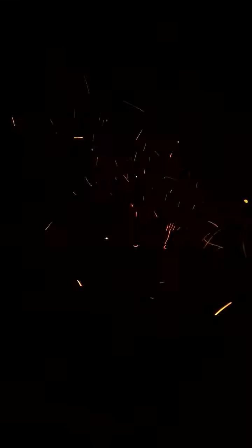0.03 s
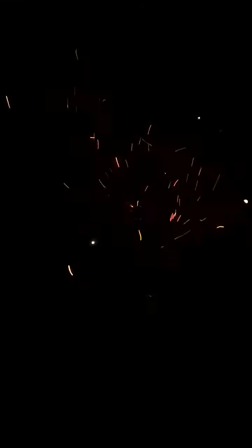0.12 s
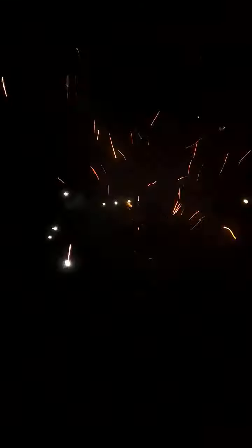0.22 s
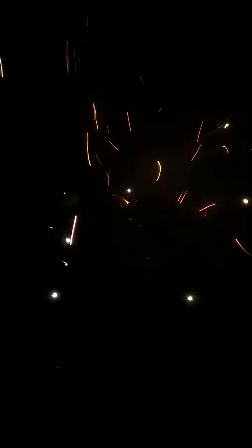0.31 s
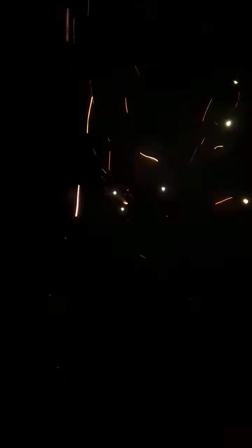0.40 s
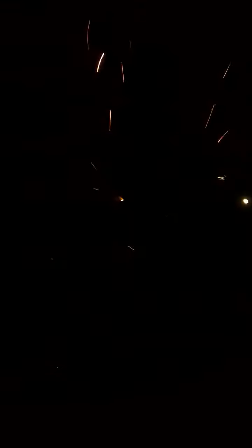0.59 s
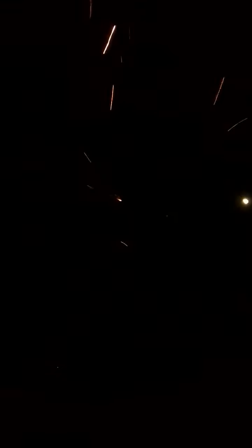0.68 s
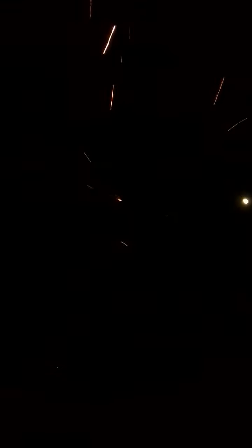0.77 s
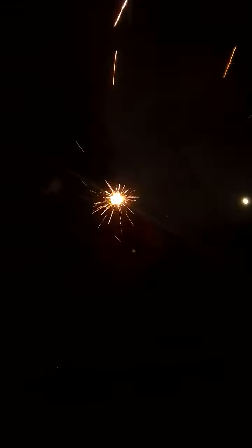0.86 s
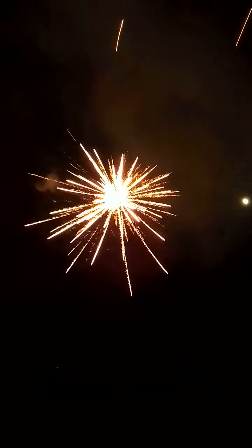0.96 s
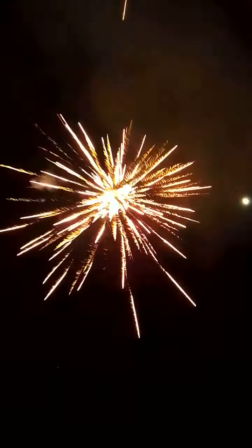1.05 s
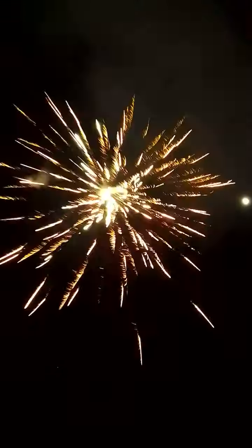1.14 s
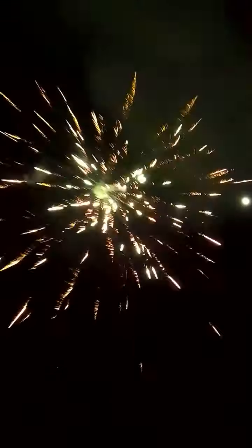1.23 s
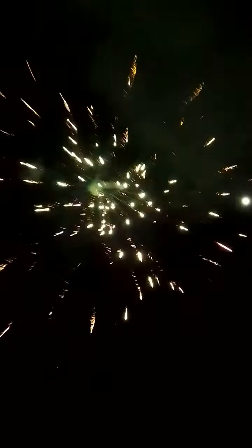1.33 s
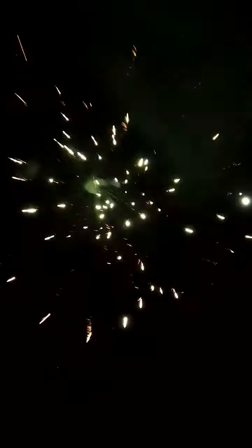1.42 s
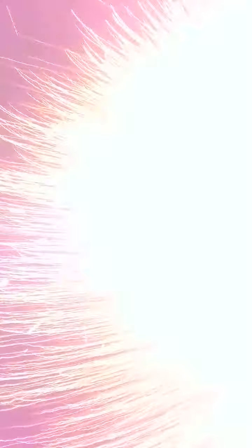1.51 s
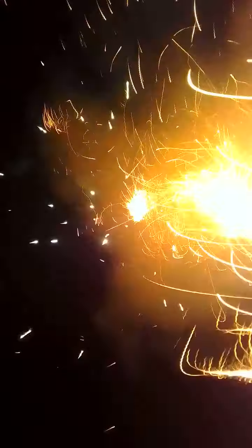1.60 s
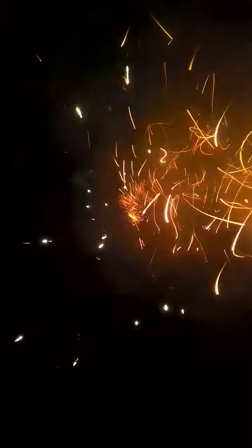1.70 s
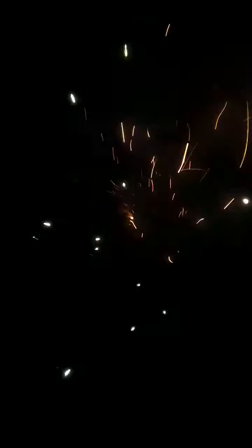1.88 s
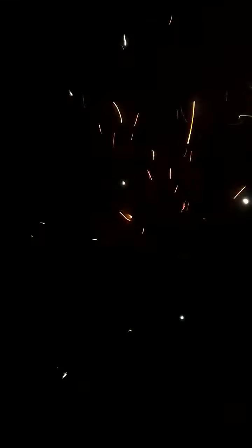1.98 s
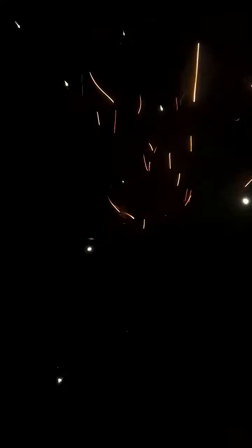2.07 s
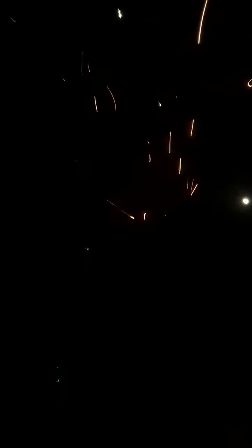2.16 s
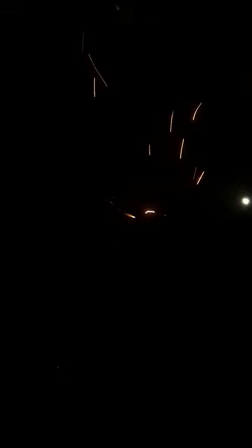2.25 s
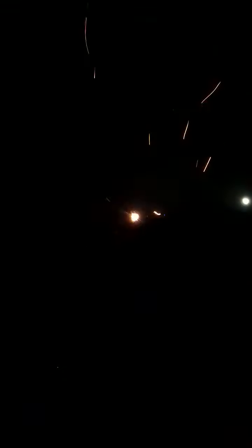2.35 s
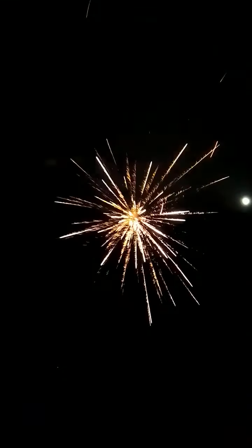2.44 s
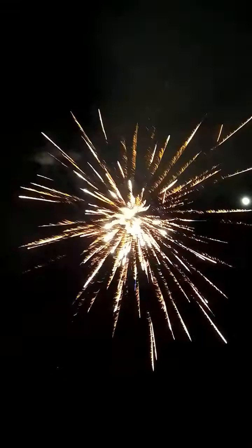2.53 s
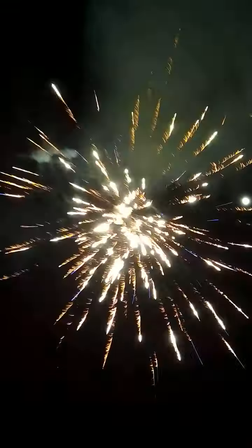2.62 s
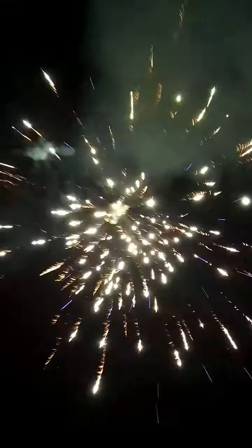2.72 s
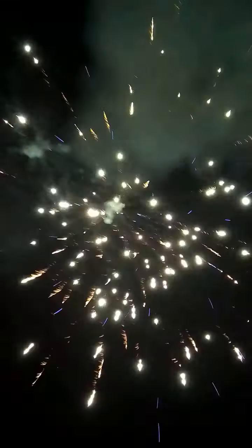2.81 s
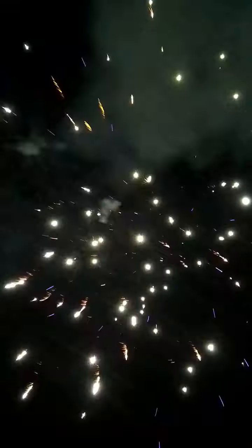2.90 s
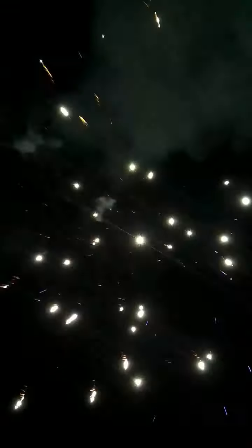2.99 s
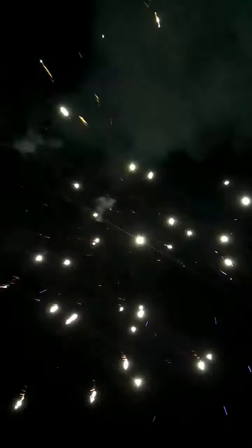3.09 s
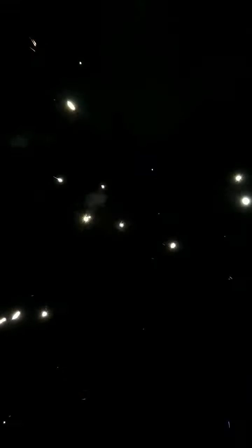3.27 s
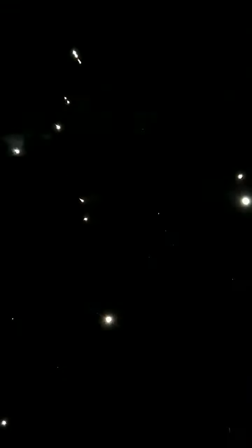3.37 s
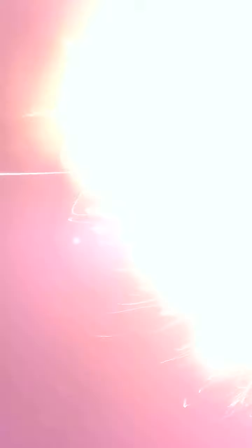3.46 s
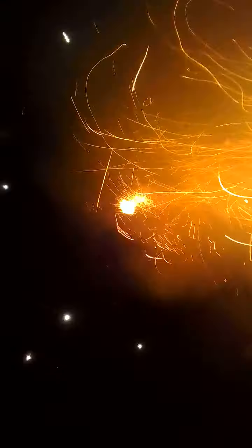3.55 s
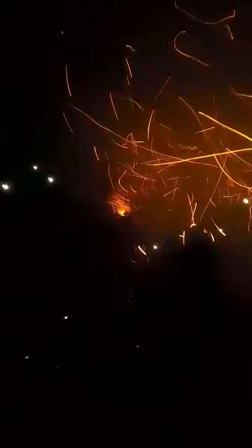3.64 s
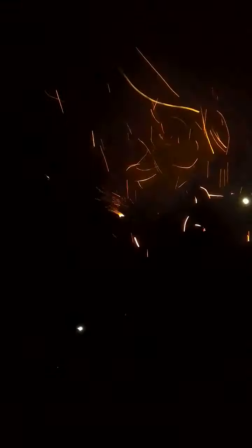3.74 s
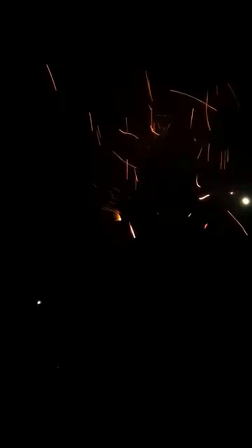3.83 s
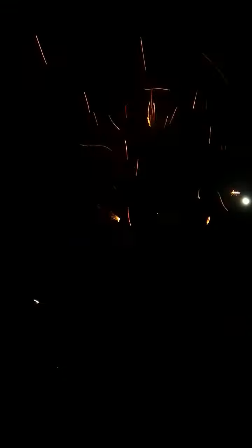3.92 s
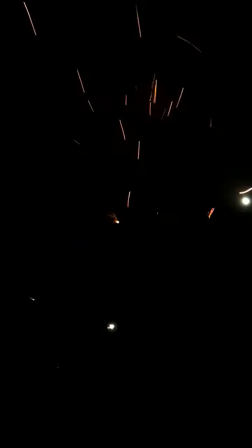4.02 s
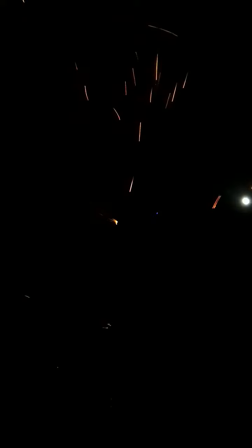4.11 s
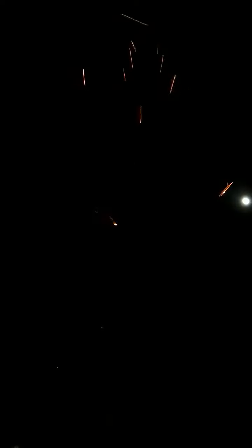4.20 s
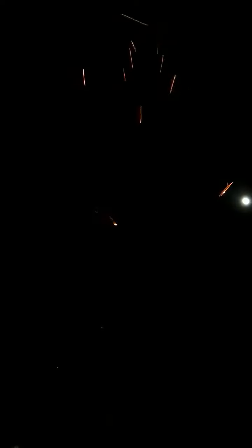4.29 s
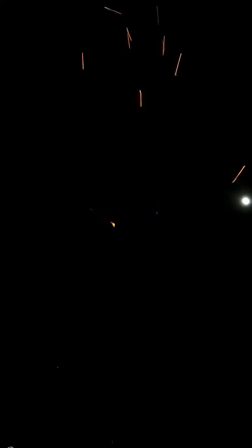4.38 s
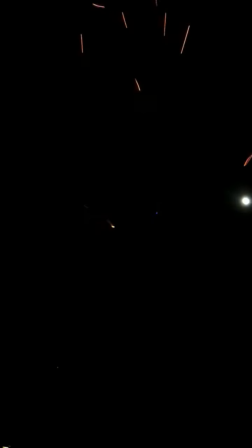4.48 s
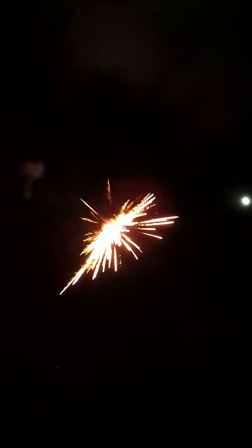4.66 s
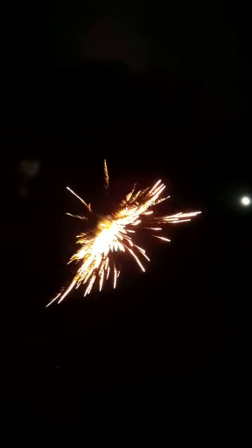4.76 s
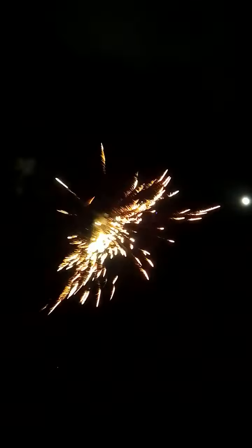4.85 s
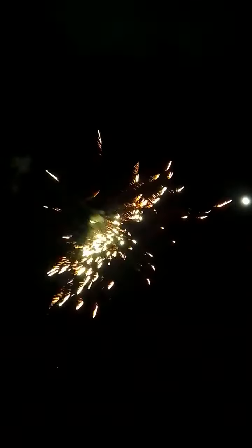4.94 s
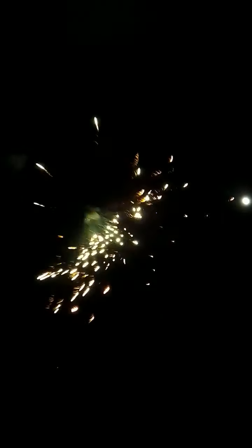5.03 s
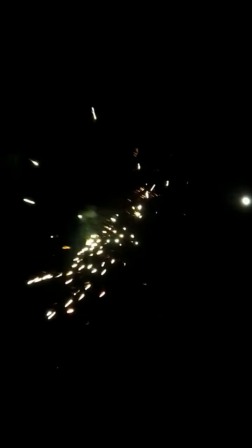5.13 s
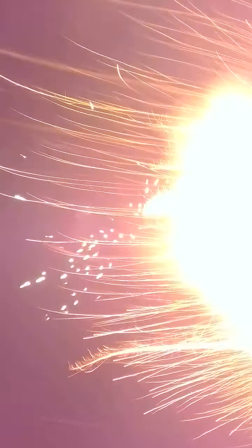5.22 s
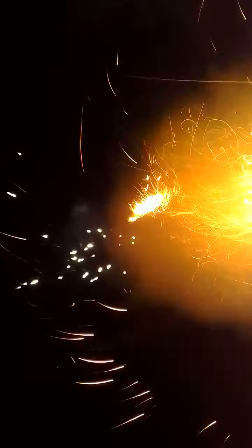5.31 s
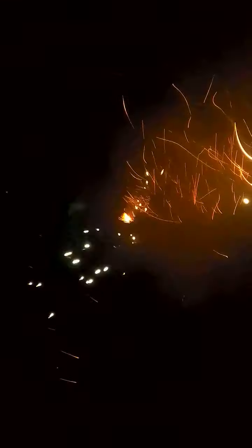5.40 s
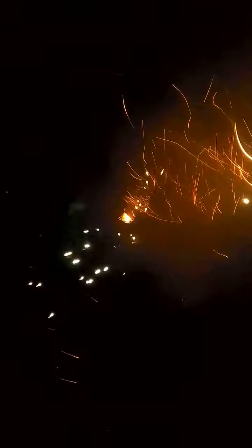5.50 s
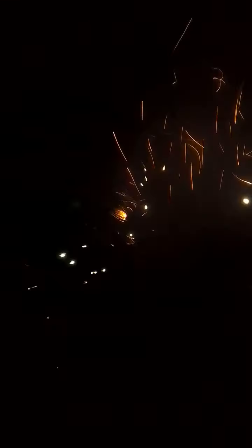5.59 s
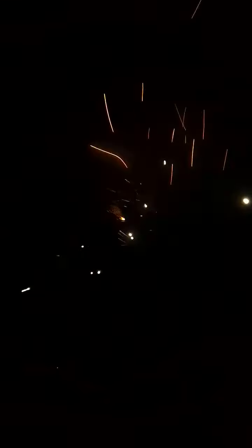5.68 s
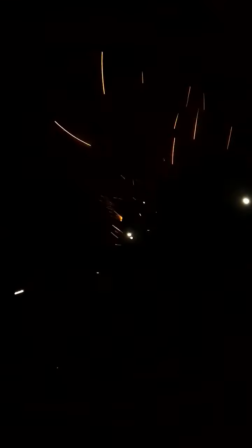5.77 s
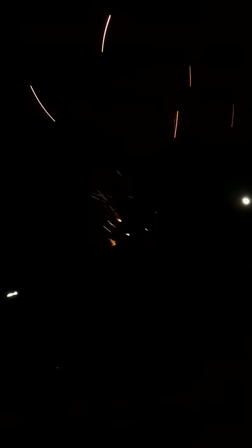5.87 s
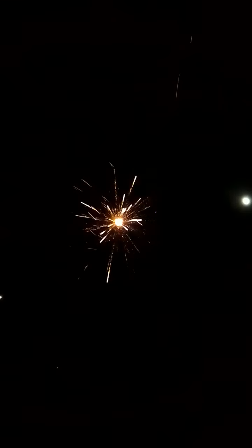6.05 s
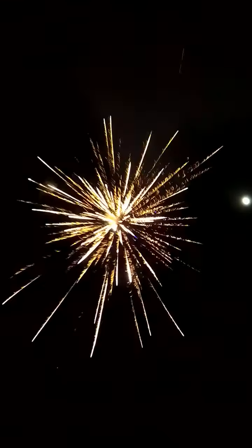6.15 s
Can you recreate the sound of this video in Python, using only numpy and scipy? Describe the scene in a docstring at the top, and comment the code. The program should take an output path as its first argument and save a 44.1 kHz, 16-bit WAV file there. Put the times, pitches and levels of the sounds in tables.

```python
"""The fading boom and echo of a firework launch are heard first, outdoors at night; a sharp burst follows.
Each launch is a jet of gas that sets a cardboard tube booming; about a second later a shell cracks overhead
as a steep shock wave. Houses and trees return every shot as a rushing, rolling echo, shaped from noise.
Lingering narrow bands of hiss, ember snaps, a low roll and faint hiss fill the gaps. The close shots
overload the microphone, and its limiter ducks just ahead of them."""
import sys
import numpy as np
from scipy import signal
from scipy.io import wavfile
from scipy.ndimage import uniform_filter1d, minimum_filter1d

SR = 44100
rng = np.random.default_rng(int(sys.argv[2]) if len(sys.argv) > 2 else 0)


def generate_wav(sig):
    """Save sig (samples, or channels by samples) to the path in sys.argv[1] as 16-bit PCM at SR."""
    pcm = np.round(np.clip(np.atleast_2d(sig).T, -1, 1) * 32767).astype(np.int16)
    wavfile.write(sys.argv[1], SR, pcm)


N = 271656
TIME = np.arange(N) / SR

# launches: start_s, jet_db, boom_db, sputter_db, sputter_delay_s, rush_delay_s, rush_db, rush_top_hz,
# low_band_hz, low_band_db, high_band_hz, high_band_db, comb_spacing_hz, comb_db,
# echo_db, late_echo_db (added as the echo ages)
LAUNCHES = [(-.235, -16.5, 12, 11, 0.023, 0.75, -45.5, 1665, 2300, -56.5, 7540, -58.5, 1292, 13.5, -23.5, 7.5),
            (1.544, 5, 12, 3.5, 0.016, 1.1, -49, 979, 1810, -55, 7190, -57.5, 1413, 4, -21.5, 2.5),
            (3.4469, -6.5, 12.5, -7, 0.0074, 1.25, -49.5, 1078, 2145, -61.5, 7905, -79, 1138, 9, -16.5, -17.5),
            (5.2613, 4.5, 13.5, 5, 0.016, .7, -45, 1880, 1855, -63, 7680, -68.5, 1328, -2, -21.5, 1)]
# shell bursts: start_s, shock_db, push_s, shudder_db, shudder_hz, scatter_db,
# comb_spacing_hz, comb_db, echo_db, late_echo_db (added as the echo ages)
BURSTS = [(0.9611, 21.5, 0.00047, 14.5, 522, 1.5, 944, 7, -18.5, 4.5),
          (2.4897, 11, 0.0011, 17, 485, -4.5, 930, 6.5, -16, 3),
          (4.656, 10.5, 0.00086, -14.5, 170, -17.5, 935, 7, -21, 5.5)]
# snaps of falling embers: start_s, level_db (before the band filter and its make-up gain)
EMBER_SNAPS = [(3.7609, -47), (3.7764, -45), (3.8507, -53), (4.0447, -46), (4.158, -60)]
# single far walls slapping a burst back: start_s, level_db (before the second band filter)
WALL_SLAPS = [(1.145, -20), (2.6704, -16.5), (2.801, -23), (2.8894, -21.5), (3.1386, -27), (3.271, -37.5),
              (4.8512, -24)]

# odd quarter-wave modes of the tube: pitch_hz, level_db, t60_s, rise_s, echo_share_db
TUBE_MODES = [(285.6, 1.5, 0.12, 0.0043, -2), (842.3, 7, 0.077, 0.036, -37), (1410, -20, 0.098, 0.019, -17)]
# returns of the boom from walls: delay_s, spread_s (half-width at 1/e), level_db
BOOM_ECHOES = [(.052, 0.0078, -36.5), (.128, 0.039, -24), (.232, 0.049, -36.5), (.35, 0.085, -51.5)]

# noise colours: pitch_hz, density_db (per hertz, relative)
LAUNCH_ECHO_COLOUR = [(50, -25.5), (110, -15.5), (200, -1.5), (300, 0), (400, -1.5), (800, 1.5),
                      (1300, -4.5), (2400, 1), (4800, -2), (7800, 0), (10000, -11.5), (15500, -9.5)]
BURST_ECHO_COLOUR = [(50, -35), (110, -19.5), (190, -3), (290, 9), (390, -14), (530, 1.5), (850, 0),
                     (1300, -15.5), (2300, -12.5), (5000, -14), (7800, -12), (10000, -26), (15500, -28.5)]
LOW_ROLL_COLOUR = [(30, -38.5), (70, -26.5), (120, -11.5), (180, 1.5), (280, 9), (400, -28.5), (800, -35.5)]
FAR_RUSH_COLOUR = [(200, -20), (400, -7.5), (560, 5.5), (850, 2), (1150, 0), (1450, 4.5), (1900, -6),
                   (2600, -16.5)]
# tint of a faded echo: pitch_hz, gain_db
HOLLOW_TINT = [(1200, -6), (1800, 2), (2700, 0.5), (4000, 3.5), (5200, -4.5), (6700, 2.5), (8000, -0.5),
               (9500, -6.5), (12000, 0.5)]

# reflectors: delay_s, rise_s, body_db, body_t60_s, hiss_db, hiss_t60_s
# launch rows: ground around the cake, nearest houses and trees, streets behind them
LAUNCH_REFLECTORS = [(0.021, 0.022, 4.5, 0.2, -5.5, 0.15), (0.121, 0.031, -2, 0.63, -0.5, 0.16),
                     (0.239, 0.066, -16, 3.2, -20, 1.1)]
# burst rows: ground underfoot, nearest houses and trees, next row, edge of the neighbourhood
BURST_REFLECTORS = [(.001, 0.003, 17.5, 0.055, -3.5, 0.071), (0.074, 0.019, 1, 0.43, 1.5, 0.44),
                    (.3, .035, -13, 1.5, -11.5, 1.0), (.58, 0.14, -19, .75, -25, 0.41)]

# swells of the narrow hiss bands after a launch: delay_s, spread_s, width_hz
LOW_BAND_SWELL = (0.8, 0.23, 320)
HIGH_BAND_SWELL = (.53, .13, 280)

BODY_HZ, HISS_HZ = 740, 2900   # echoes blend from wall body to leafy hiss between these
AIR_DB_PER_S, AIR_HZ = 32, 10700   # extra air loss at the reference pitch, steeper above it
ROLL_DB, ROLL_T60_S, NIGHT_DB = -42.5, 5, -51.5   # low roll after each shot, over a steady floor
RUSH_SPREAD_S = 0.4
HOLLOW_DELAY_S, HOLLOW_FADE_S = 0.33, 0.37
GAP_DB, TOOTH_SHARPNESS = -6.5, 4
HOLLOW_FROM_HZ, TEETH_FROM_HZ, TEETH_TO_HZ, HOLLOW_EDGE_HZ = 900, 1500, 8200, 160
CUTOFF_HZ = 16000


def from_db(db):
    """The decibel law: 20 dB is a tenfold amplitude."""
    return np.exp(np.asarray(db) * (np.log(10) / 20))


def rms_one(x):
    """Normalization to unit root-mean-square amplitude."""
    return x / np.sqrt(np.mean(x ** 2) + 1e-20)


def butter(x, hz, kind, order=2):
    """Causal Butterworth filtering: a maximally flat pass band."""
    edges = np.clip(hz, 10, .45 * SR)
    return signal.sosfilt(signal.butter(order, edges, kind, fs=SR, output="sos"), x + 1e-18)


def drift(rate_hz):
    """Low-passed chance: noise through two equal poles wanders slowly with unit spread."""
    step, settling = 40, 2000   # samples, coarse samples
    pole = np.exp(-2 * step * np.pi * rate_hz / SR)
    white = rng.standard_normal(N // step + settling + 2)
    slow = signal.lfilter([1], [1, -2 * pole, pole * pole], white)[settling:]
    return np.interp(np.arange(N) / step, np.arange(len(slow)), rms_one(slow))


def dying(age, t60):
    """Exponential decay: 60 dB lost in each t60, silence before the start."""
    return (age >= 0) * from_db(-60 * np.clip(age / t60, 0, 5))


def swell(age, centre, spread):
    """Gaussian envelope: a bell-shaped rise and fall."""
    return np.exp(-np.minimum(((age - centre) / spread) ** 2 / 2, 50))


def ramp(x):
    """Linear crossfade: zero below 0, one above 1, straight between."""
    return np.clip(x, 0, 1)


def noise_bands(colour):
    """Spectral synthesis: third-octave noise bands as (centre Hz, signal), with joint rms near 1."""
    edges = 28 * 2 ** (np.arange(29) / 3)
    centres = np.sqrt(edges[1:] * edges[:-1])
    hz, db = np.transpose(colour)
    density = from_db(np.interp(np.log(centres), np.log(hz), db))
    gains = density * np.sqrt(np.diff(edges)) * (centres < 1.2 * hz[-1])
    gains /= np.linalg.norm(gains)
    white = rng.standard_normal((2, N))   # neighbouring bands use different noise
    bands = []
    for k, gain in enumerate(gains):
        if gain > 0:
            band = rms_one(butter(white[k % 2], edges[k:k + 2], "band", order=3))
            bands.append((centres[k], gain * band))
    return bands


def tube_booms(wander_rad=0.26, rough=.16, delay_s=.004):
    """Quarter-wave resonance: the emptied tube rings unsteadily in hot gas; walls return the note in swells."""
    out = np.zeros(N)
    phase = wander_rad * drift(25)   # at the lowest mode; higher modes in proportion
    flutter = 1 + rough * drift(53)
    lowest_hz = TUBE_MODES[0][0]
    for s, _, boom_db, *_ in LAUNCHES:
        near = (TIME > s + delay_s) & (TIME < s + 1)
        age = TIME[near] - s - delay_s
        returned = 0
        for k, (lag, spread, db) in enumerate(BOOM_ECHOES):
            sign = 1 if k % 2 else -1   # successive returns alternate in polarity
            returned = returned + sign * from_db(db) * swell(age, lag, spread / np.sqrt(2))
        for hz, db, t60, rise, echo_db in TUBE_MODES:
            direct = dying(age, t60) * (1 - np.exp(-(age / rise) ** 2))
            swing = np.sin(2 * np.pi * hz * age + phase[near] * hz / lowest_hz)
            out[near] += from_db(boom_db + db) * (direct + from_db(echo_db) * returned) * swing
    return out * flutter


def reflected(age, reflectors, leafy):
    """Energy addition: powers of reflector groups sum, each swelling in and dying away."""
    power = 0
    for delay, rise, body_db, body_t60, hiss_db, hiss_t60 in reflectors:
        db = body_db + leafy * (hiss_db - body_db)
        t60 = body_t60 + leafy * (hiss_t60 - body_t60)
        envelope = np.where(age < delay, swell(age, delay, rise), dying(age - delay, t60))
        power = power + (from_db(db) * envelope) ** 2
    return (age >= 0) * power


def echoes(shots, reflectors, colour, lumpy_db, grain_db, late_s=0.45):
    """Diffuse reflection and air absorption: walls give lumpy body, foliage hiss; long paths lose treble."""
    step = 32   # samples between envelope points
    coarse = TIME[::step]
    lumps = lumpy_db * drift(45)[::step]
    grain = grain_db * drift(190)[::step]
    out = np.zeros(N)
    for hz, band in noise_bands(colour):
        leafy = ramp(np.log(hz / BODY_HZ) / np.log(HISS_HZ / BODY_HZ))
        power = 0
        for s, *_, echo_db, late_db in shots:
            age = np.maximum(coarse - s, 0)
            air_loss_db = AIR_DB_PER_S * age * (hz / AIR_HZ) ** 5
            db = echo_db + late_db * np.minimum(age / late_s, 1) - air_loss_db
            power = power + from_db(db) ** 2 * reflected(coarse - s, reflectors, leafy)
        unevenness = from_db(lumps + leafy * (grain - lumps / 2))
        out += band * np.interp(TIME, coarse, np.sqrt(power) * unevenness)
    return out


def hollowed(echo, size=1024):
    """Comb coloration: gaps open in a fading echo's treble between evenly spaced bands, until the next shot."""
    hz, t, cells = signal.stft(echo, SR, nperseg=size)
    shots = sorted(LAUNCHES + BURSTS)
    ends = [shot[0] - size / SR for shot in shots[1:]] + [np.inf]
    tint_db = np.interp(hz, *np.transpose(HOLLOW_TINT))
    treble = ramp((hz - HOLLOW_FROM_HZ) / HOLLOW_EDGE_HZ)
    singing = ramp((hz - TEETH_FROM_HZ) / HOLLOW_EDGE_HZ) * ramp((TEETH_TO_HZ - hz) / HOLLOW_EDGE_HZ)
    for (s, *_, spacing_hz, comb_db, _, _), end in zip(shots, ends):
        teeth = singing * np.abs(np.cos(np.pi * hz / spacing_hz)) ** TOOTH_SHARPNESS
        db = treble * (tint_db + GAP_DB + (comb_db - GAP_DB) * teeth)
        depth = ramp((t - s - HOLLOW_DELAY_S) / HOLLOW_FADE_S) * (t < end)
        cells = cells * from_db(np.outer(db, depth))
    return signal.istft(cells, SR, nperseg=size)[1][:N]


def distant_rumble(flutter_db=0.9):
    """Noise of distant origin: shots leave a low roll; launches also a far rush with a sharp upper edge."""
    low, middle = (from_db(flutter_db * drift(14)) * sum(band for _, band in noise_bands(colour))
                   for colour in (LOW_ROLL_COLOUR, FAR_RUSH_COLOUR))
    roll_power = sum((from_db(ROLL_DB) * dying(TIME - s, ROLL_T60_S)) ** 2 for s, *_ in LAUNCHES + BURSTS)
    out = low * np.sqrt(from_db(NIGHT_DB) ** 2 + roll_power)
    for s, _, _, _, _, delay, db, top_hz, *_ in LAUNCHES:
        rush = butter(middle, top_hz, "low", order=12)
        out += from_db(db) * swell(TIME - s, delay, RUSH_SPREAD_S) * rush
    return out


def steady_hiss(level_db=-74, band_hz=(4500, 9500), lower_db=-70, lower_hz=(1500, 3900)):
    """Stationary noise: a faint, even floor of hiss, a little stronger in its lower part."""
    return sum(from_db(db) * rms_one(butter(rng.standard_normal(N), hz, "band"))
               for db, hz in ((level_db, band_hz), (lower_db, lower_hz)))


def lingering_bands(waver_db=1.5):
    """Narrow-band noise: two narrow bands of hiss swell and fade after each launch, the high one first."""
    out, white = np.zeros(N), rng.standard_normal(N)
    for s, *_, low_hz, low_db, high_hz, high_db, _, _, _, _ in LAUNCHES:
        for hz, db, (delay, spread, width) in ((low_hz, low_db, LOW_BAND_SWELL),
                                               (high_hz, high_db, HIGH_BAND_SWELL)):
            band = rms_one(butter(white, [hz - width / 2, hz + width / 2], "band", order=3))
            out += from_db(db) * swell(TIME - s, delay, spread) * band
    return out * from_db(waver_db * drift(25))


def shell_cracks(edge_hz=3800, shudder_t60=0.018, scatter_t60=0.065, scatter_hz=(620, 1100),
                 fizz_db=-13, fizz_t60=0.042):
    """Blast wave: a steep shock with its suction, a few heavy swings of air, and scatter from nearby ground."""
    out = np.zeros(N)
    scatter = rms_one(butter(rng.standard_normal(N), scatter_hz, "band"))
    fizz = from_db(fizz_db) * rms_one(butter(rng.standard_normal(N), [1200, 8000], "band"))
    for s, shock_db, push_s, shudder_db, hz, scatter_db, *_ in BURSTS:
        age = TIME - s
        pushes = np.clip(age / push_s, 0, 40)   # age in push lengths; pressure reverses at 1
        shock = (age >= 0) * (1 - pushes) * np.exp(-pushes)
        shudder = dying(age, shudder_t60) * np.sin(2 * np.pi * hz * age) * (1 - np.exp(-pushes))
        out -= from_db(shock_db) * shock + from_db(shudder_db) * shudder
        out += from_db(scatter_db) * (scatter * dying(age, scatter_t60) + fizz * dying(age, fizz_t60))
    return butter(butter(out, edge_hz, "low", order=1), 86, "high")


def wall_slaps(t60=0.039, band_hz=(220, 950)):
    """Discrete reflection: dull knocks stand out of the rolling echo."""
    knock = rms_one(butter(rng.standard_normal(N), band_hz, "band"))
    envelope = sum(from_db(db) * dying(TIME - s, t60) for s, db in WALL_SLAPS)
    return butter(knock * envelope, band_hz, "band", order=4)


def gas_jets(jet_s=0.0055, lead_t60=0.013, stop_t60=0.0035, sputter_s=0.012, top_hz=8600, low_db=-5,
             pulsing=1.0, ragged_db=3, hiss_db=-4):
    """Jet turbulence: gas leaks, roars for milliseconds, then sputters raggedly in pulses timed to the tube's
    lowest note."""
    hiss = rms_one(butter(butter(rng.standard_normal(N), 190, "high"), top_hz, "low", order=6))
    body = from_db(low_db) * rms_one(butter(rng.standard_normal(N), [90, 1400], "band"))
    jet, sputter = np.zeros(N), np.zeros(N)
    for s, jet_db, _, sputter_db, delay, *_ in LAUNCHES:
        age = TIME - s
        away = np.maximum(-age / lead_t60, (age - jet_s) / stop_t60)   # before or after the roar, in t60s
        jet += from_db(jet_db - 60 * np.clip(away, 0, 5))
        pulses = 1 - pulsing * np.cos(np.pi * TUBE_MODES[0][0] * age) ** 2   # at the lowest tube mode
        sputter += from_db(sputter_db) * (age > 0) * swell(age, delay, sputter_s) * pulses
    ragged = from_db(ragged_db * drift(130))
    return (hiss + body) * jet + (from_db(hiss_db) * hiss + body) * sputter * ragged


def ember_snaps():
    """Impulsive noise: tiny bright ticks, each dying within milliseconds."""
    envelope = sum(from_db(db) * dying(TIME - s, .012) for s, db in EMBER_SNAPS)
    return 2 * butter(rng.standard_normal(N) * envelope, [4000, 9500], "band", order=3)


def scene():
    """Superposition: launches, bursts, their echoes and the night around them add linearly."""
    returns = (echoes(LAUNCHES, LAUNCH_REFLECTORS, LAUNCH_ECHO_COLOUR, lumpy_db=1.5, grain_db=1.27)
               + echoes(BURSTS, BURST_REFLECTORS, BURST_ECHO_COLOUR, lumpy_db=1.4, grain_db=1.5))
    shots = gas_jets() + tube_booms() + shell_cracks() + wall_slaps()
    night = distant_rumble() + steady_hiss()
    return (shots + hollowed(returns) + lingering_bands() + ember_snaps() + night)[None]


def limiter(x, threshold_db=-2, depth_db=11, ahead_s=0.045, release_db_per_s=330):
    """Look-ahead gain reduction: the gain drops ahead of each overload and climbs back after it."""
    over = np.clip(20 * np.log10(np.abs(x) + 1e-9) - threshold_db, 0, depth_db)
    size = 2 * int(ahead_s * SR / 2) + 1
    over = -minimum_filter1d(-over, size, origin=-(size // 2))   # greatest overload just ahead
    release = release_db_per_s * TIME
    cut = np.maximum.accumulate(over + release) - release
    return x * from_db(-uniform_filter1d(cut, size=200))


def record(dry):
    """Microphone overload: limiter, flat clipping of what still gets through, bass roll-off and top cut."""
    ceiling = .71
    clipped = np.clip(limiter(dry[0]), -ceiling, ceiling)
    thinned = butter(clipped, 51, "high", order=1)
    top_cut = signal.ellip(10, .1, 50, CUTOFF_HZ, fs=SR, output="sos")
    return signal.sosfiltfilt(top_cut, thinned)[None]


dry = scene()
out = record(dry)
generate_wav(out)
```